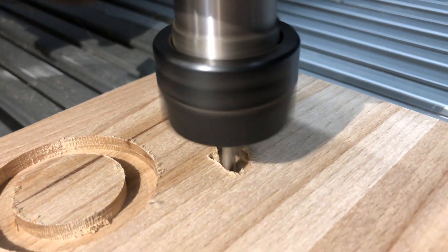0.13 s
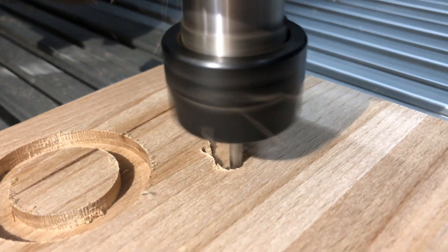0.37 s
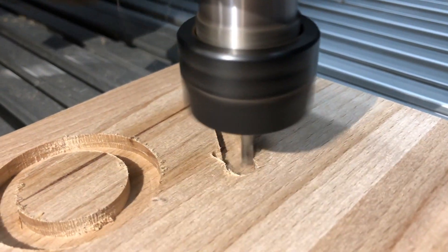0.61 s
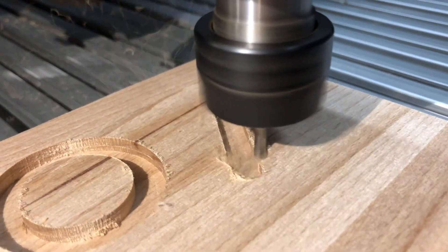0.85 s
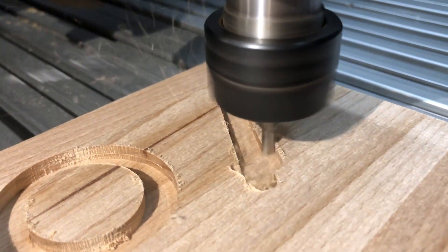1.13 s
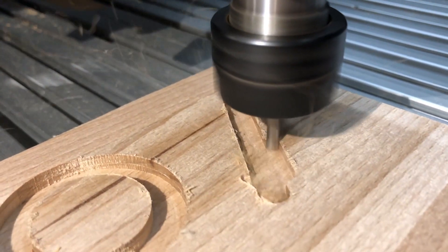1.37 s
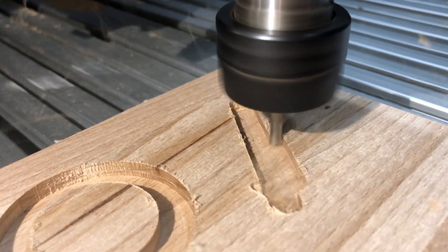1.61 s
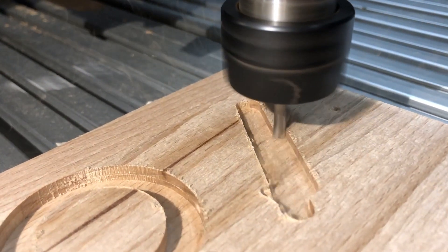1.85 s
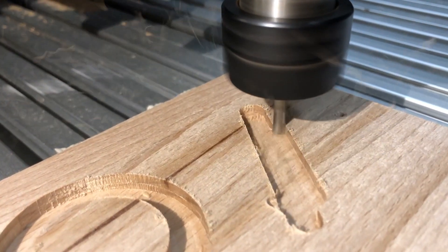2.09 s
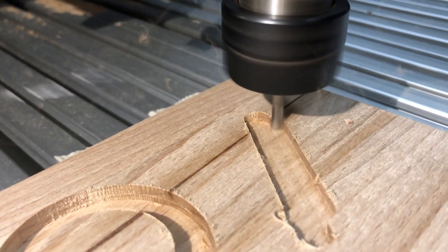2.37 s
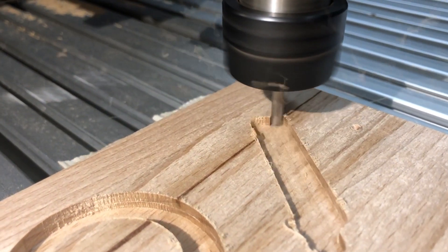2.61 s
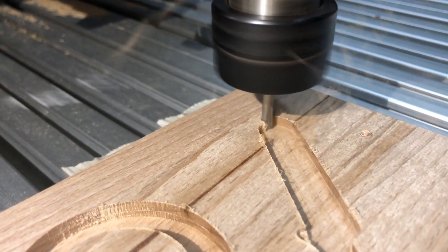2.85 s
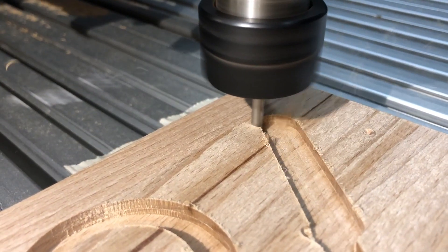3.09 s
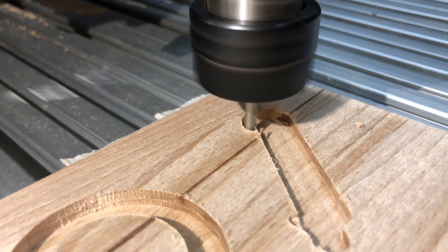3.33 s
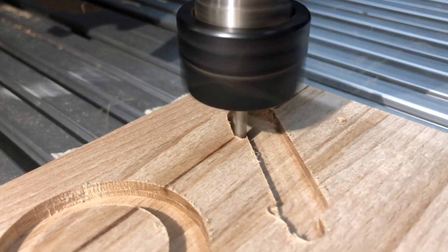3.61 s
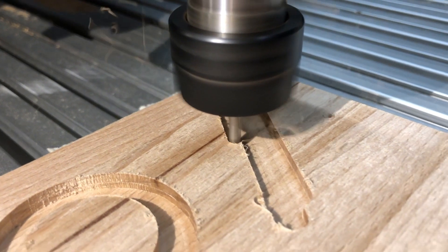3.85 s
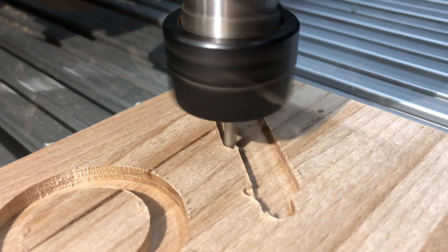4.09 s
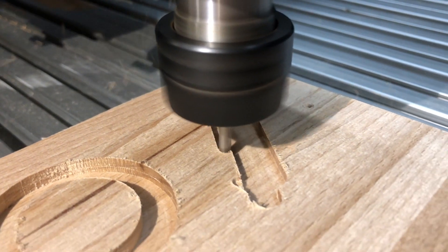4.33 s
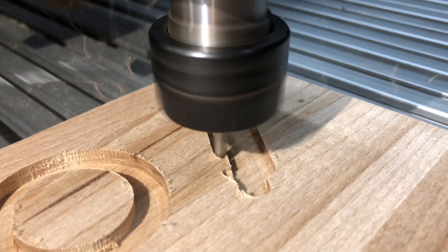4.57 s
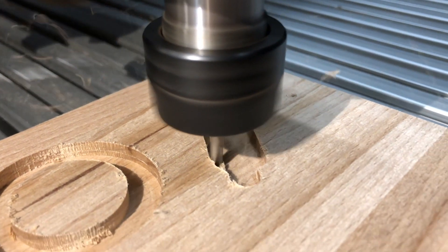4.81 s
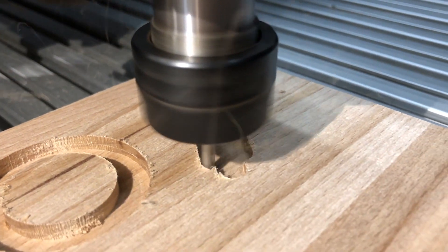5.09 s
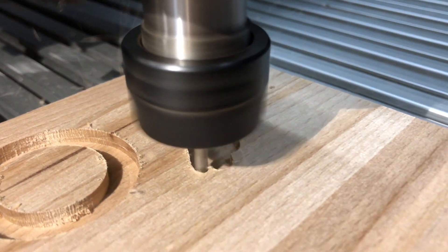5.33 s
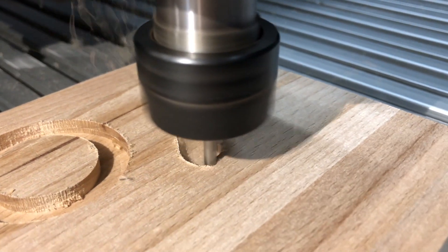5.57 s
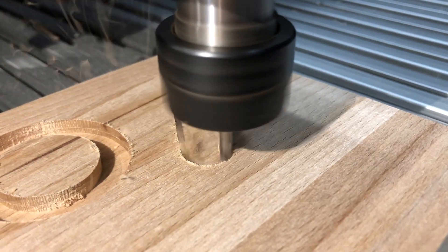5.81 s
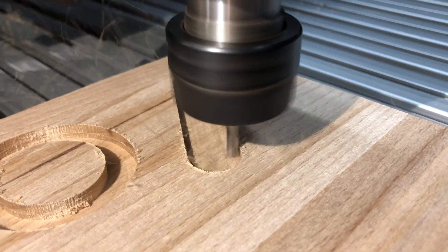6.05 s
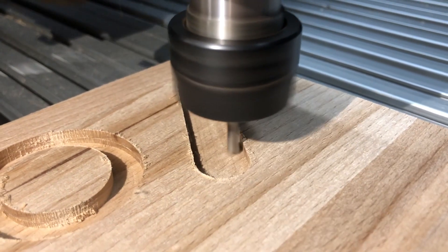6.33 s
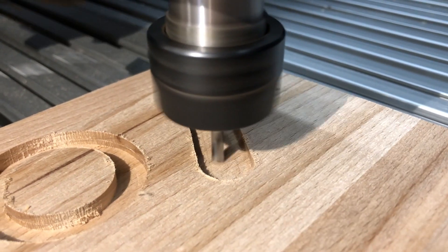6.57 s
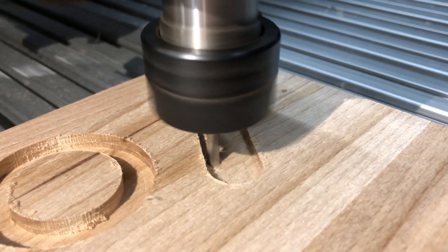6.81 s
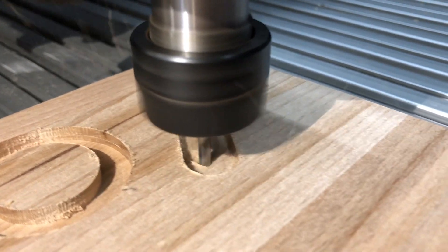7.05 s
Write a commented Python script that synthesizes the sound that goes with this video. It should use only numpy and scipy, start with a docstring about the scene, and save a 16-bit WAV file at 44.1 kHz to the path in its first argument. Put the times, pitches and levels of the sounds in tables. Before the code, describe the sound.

A steady, high-pitched spindle whine with airy roar fills a close mono microphone with automatic level control. A milling bit chatters shrilly in wood, stuttering on entry, easing, then screaming continuously along a slot and back, brighter and rougher at the far corner. Feed motors hum faintly below. After dull carriage knocks and one last strong cut, the screech fades to bare whine and a little hiss.

```python
"""At a router gantry, close to the work: a spindle whines at about 24000 turns a minute, heard by one
mono microphone with gain control, while a two-flute end mill cuts a wooden block.
Shaft multiples make the whine; noise rung by the housing is the roar; feed motors hum and knock below.
The tool chatters near 5 kHz as sidebands that form one burst per turn, with an octave and a twelfth.
Chips hiss as filtered noise that pulses with the turn."""
import sys
import numpy as np
from scipy import signal
from scipy.fft import rfft, irfft, next_fast_len
from scipy.io import wavfile
from scipy.ndimage import uniform_filter1d

SR = 44100
rng = np.random.default_rng(int(sys.argv[2]) if len(sys.argv) > 2 else 0)


def master_out(mix):
    """Clip the mix to full scale and print it as 16-bit PCM to the path in sys.argv[1]."""
    frames = np.transpose(np.atleast_2d(mix))
    ceiling = np.clip(frames, -1, 1)
    pcm = np.round(ceiling * 32767).astype(np.int16)
    wavfile.write(sys.argv[1], SR, pcm)


def rack_gain(trim_db):
    """Turn a fader trim in dB into the linear factor to multiply a signal by."""
    fader = np.asarray(trim_db, float)
    return 10 ** (fader / 20)


N = 316638
T = np.arange(N) / SR
SIZE = next_fast_len(N)
HZ = np.maximum(np.arange(SIZE // 2 + 1) * SR / SIZE, 1)

STEP = 64  # samples between points of the slowly changing sideband gains
MOVE_BLEND_S = .06
FULL_BITE_DB = -30.5  # chatter level of a full bite


def curves(table):
    """Columns of a table, drawn as straight lines between its times."""
    s, *columns = np.transpose(table)
    return [np.interp(T, s, c) for c in columns]


def steps(table, blend_s):
    """Columns held from one row's start to the next, with soft changes."""
    s, *columns = np.transpose(table)
    row = np.maximum(np.searchsorted(s, T) - 1, 0)
    return [uniform_filter1d(c[row], int(blend_s * SR) + 1) for c in columns]


def colour(points, hz):
    """Gain at hz of a spectrum given as (f/Hz, level/dB) points."""
    f, db = np.transpose(points)
    return rack_gain(np.interp(np.log(hz), np.log(f), db))


def unit(x):
    """Scale to rms 1."""
    return x / np.sqrt(np.mean(x ** 2))


def walk(rate):
    """Random levels held for 1 / rate s, slewed twice, rms 1."""
    hold = int(SR / rate)
    levels = np.repeat(rng.standard_normal(N // hold + 1), hold)
    return unit(uniform_filter1d(uniform_filter1d(levels, hold), hold)[:N])


def flickering_noise(gain, flicker_db, rate, count):
    """Noise whose half-octave bands, from 16 kHz down, waver separately; the last takes all below."""
    spectrum = rfft(rng.standard_normal(SIZE)) * gain
    place = np.minimum(2 * np.log2(16000 / np.minimum(HZ, 16000)), count - 1)
    out = 0
    for k in range(count):
        share = np.cos(np.pi / 2 * np.clip(place - k, -1, 1)) ** 2
        out = out + rack_gain(flicker_db * walk(rate)) * irfft(spectrum * share, SIZE)[:N]
    return unit(out)


# spindle rate, drooping under load: t/s, f/Hz
SHAFT = [(0, 397.9), (1, 397.6), (5.9, 397.5), (6.4, 398.2), (7.18, 397.8)]
SIDEBAND_HZ = SHAFT[0][1]  # spacing used to look up sideband gains


def shaft_turn():
    """Shaft angle in radians: the running sum of its rate."""
    return 2 * np.pi * np.cumsum(curves(SHAFT)[0]) / SR


# tool position along the slot: t/s, place (0 near end, 1 far end)
PATH = [(.8, 0), (2.6, 1), (3.2, 1), (5.3, 0)]


def slot_place():
    """The place of the tool sets how block and spindle sound."""
    return curves(PATH)[0]


def travel(place):
    """Share of the way back and of the sideways step at the far end, from the direction of motion."""
    way = uniform_filter1d(np.sign(np.gradient(place)), int(.1 * SR))
    returning = np.maximum(-way, 0) * np.minimum(place / .22, 1)
    crossing = place * (1 - np.abs(way))
    return returning, crossing


# how deep the edge bites: t/s, chatter level/dB
BITE = [(0, -56), (.1, -44), (.14, -31.5), (.33, -33), (.47, -31), (.51, -39.5), (.635, -46), (.655, -29.5),
        (.78, -26.5), (.95, -30), (1.6, -29), (2.05, -25.5), (2.66, -27), (2.85, -29), (3.05, -28.5),
        (3.08, -31.5), (3.14, -30.5), (3.21, -28), (3.25, -26), (4.4, -28), (4.8, -32), (5.25, -32),
        (5.5, -28), (5.9, -25), (6.09, -30.5), (6.105, -35), (6.15, -35.5), (6.45, -60), (7.18, -39)]


def bite_level():
    """Chatter level in dB follows the depth of the bite."""
    return curves(BITE)[0]


# shaft multiples: multiple, near-end level/dB, far-end level/dB, change on the way back/dB,
# change stepping sideways/dB, level out of the wood/dB
SHAFT_ORDERS = [(1, -50, -51.5, -4.5, -2, -52.5), (2, -40, -53.5, 6, 6.5, -49.5),
                (3, -54, -39.5, -3, -6, -66), (5, -77, -66, -9, 18, -74), (6, -39.5, -41.5, -1, 2.5, -37)]
# the third multiple drops out at the turn: from t/s, to t/s, level change/dB under full load
THIRD_DROPS = (3, 3.16, -11)


def loaded_orders(bite_db, place):
    """Shaft multiples change with the place on the block, the direction of travel and the load."""
    returning, crossing = travel(place)
    load = uniform_filter1d(1. * (bite_db > FULL_BITE_DB - 4), int(.3 * SR))
    start, end, drop_db = THIRD_DROPS
    turning = drop_db * uniform_filter1d(1. * (T > start) * (T < end), int(MOVE_BLEND_S * SR))
    lines = []
    for k, near, far, back, side, idle in SHAFT_ORDERS:
        cutting = near + (far - near) * place + back * returning + side * crossing
        cutting = cutting + (k == 3) * turning
        lines.append((round(k), idle + load * (cutting - idle)))
    return lines


# weak shaft multiples that hold their level: multiple, level/dB
WEAK_ORDERS = [(4, -52), (7, -57), (8, -56), (12, -56)]


def whine(turn, lines):
    """Clean shaft multiples, each wavering slightly in level and phase."""
    out = 0
    for k, db in [*lines, *WEAK_ORDERS]:
        level = np.sqrt(2) * rack_gain(db + 1.46 * walk(20) + 1.5 * walk(3.995))
        out = out + level * np.cos(k * turn + 0.15 * walk(15) + k)
    return out


# air and bearing roar before the housing: f/Hz, relative level/dB
ROAR = [(40, -41), (200, -26), (520, -20.5), (1200, -13), (2000, -15.5), (3300, -14.5), (5500, -18.5),
        (6400, -20), (9000, -18.5), (11800, -24), (15700, -24.5)]
# housing resonances: f/Hz, width between quarter-power points f/Hz, level over the roar/dB
HOUSING = [(865, 110, 11), (1703, 250, 6.5), (2300, 265, 8), (2564, 187, 8.5), (3850, 420, 7),
           (4770, 260, 9), (7320, 710, 6.5), (8280, 156, 8)]
# gantry shudder: f/Hz, relative level/dB
SHUDDER = [(25, -34), (42, -12), (70, -9.5), (160, 1.5), (320, -5.5), (600, -30.5)]
ROAR_DB = -30.5  # at the near end
FAR_ROAR_DB, SIDEWAYS_ROAR_DB = -3, 2.5  # weaker at the far end, less so while stepping sideways


def roar(place):
    """Air and bearing noise rung by the housing, over an unevenly shuddering gantry."""
    rings = sum((rack_gain(2 * db) - 1) / (1 + (2 * (HZ - hz) / width) ** 2) ** 2
                for hz, width, db in HOUSING)
    air = flickering_noise(colour(ROAR, HZ) * np.sqrt(1 + rings), 1.33, 7, count=13)
    shudder = flickering_noise(colour(SHUDDER, HZ), .1, 7, count=1) * rack_gain(3.3 * walk(25))
    level_db = ROAR_DB + FAR_ROAR_DB * place + SIDEWAYS_ROAR_DB * travel(place)[1]
    return rack_gain(level_db) * (air + rack_gain(-23.0) * shudder)


def spindle(turn, bite_db, place):
    """The turning shaft whines while its air and bearings roar."""
    return whine(turn, loaded_orders(bite_db, place)) + roar(place)


# feed motors: from t/s, to t/s, f/Hz, level/dB
FEED = [(0, .3, 145.5, -55.5), (.27, 0.42, 348, -50), (0.366, 0.685, 184.3, -56.5), (.95, 2.55, 144, -60),
        (.8, 2.6, 260, -61), (3.45, 5.301, 149.2, -60), (3.45, 5.306, 133.9, -58.5),
        (6.046, 6.43, 131.4, -57.5), (6.744, 7.2, 129.5, -59), (6.75, 7.206, 192.4, -58)]
# the carriage knocks as it reverses: t/s, f/Hz, peak level at onset/dB, 60 dB decay t/s
KNOCKS = [(5.34, 184, -34, 0.053), (5.39, 394, -34, 0.099), (5.39, 80, -41, 0.15), (5.47, 340, -36.5, 0.15),
          (5.921, 152, -37, 0.086)]


def feed():
    """Stepper hum for each move, and short knocks as decaying sines."""
    out = np.zeros(N)
    for start, end, hz, db in FEED:
        running = np.clip(np.minimum(T - start, end - T) / 0.032, 0, 1)
        hum = np.cos(2 * np.pi * hz * T + 0.25 * walk(9.6))
        out += running * np.sqrt(2) * rack_gain(db + 2.9 * walk(18)) * hum
    for s, hz, db, t60 in KNOCKS:
        age = np.maximum(T - s, 0)
        decay = rack_gain(db - 60 * age / t60) * np.minimum(age / 0.0019, 1)
        out += decay * np.sin(2 * np.pi * hz * age)
    return out


# overtones for each move: start t/s, octave loudest near f/Hz, octave level/dB,
# level/dB shared by twelfth and chips, all at full bite
OVERTONES = [(0, 10000, -39.5, -28.5), (.7, 11200, -34.5, -27.5), (.87, 9700, -42, -27.5),
             (1.75, 10200, -39.5, -31), (2.2, 10500, -36, -30), (2.62, 10600, -38.5, -32.5),
             (2.91, 10800, -31.5, -32), (3.07, 10300, -33, -29.5), (3.14, 11100, -30, -29),
             (3.25, 10600, -37.5, -31), (3.6, 10800, -34, -33), (4, 10560, -32.5, -32),
             (4.45, 10170, -31.5, -29), (4.87, 10150, -35.5, -27.5), (5.3, 9600, -40, -26),
             (5.61, 10200, -33.5, -25.5), (5.94, 10000, -37.5, -28)]


def overtone_levels(bite_db):
    """Octave region and overtone levels; below a full bite they fade with the chatter."""
    octave_hz, octave_db, top_db = steps(OVERTONES, MOVE_BLEND_S)
    lost_db = np.minimum(bite_db - FULL_BITE_DB, 0)
    return octave_hz, octave_db + lost_db, top_db + lost_db


# chip hiss: f/Hz, relative level/dB
CHIP_COLOUR = [(3000, -51), (4700, -11), (6500, -15), (8500, -25), (10200, -14), (12000, -18), (13300, -14),
               (14100, -5), (14900, 0), (15800, -6)]


def chips(turn, top_db, tonal):
    """Chip hiss pulses with the turn and takes the share of the top band that is not tonal."""
    hiss = flickering_noise(colour(CHIP_COLOUR, HZ), 1.7, 17, count=5)
    hiss = unit(hiss * (1 + .6 * np.cos(turn + 1.6)))
    return rack_gain(top_db + 3.5 + 1.2 * walk(40)) * np.sqrt(1 - tonal) * hiss


STUTTER_DB, STUTTER_ABOVE_HZ = -11, 5250


def bursts(phase, hz, turn, weight, sweep, waver_db, count, gaps=0 * T, gaps_above_hz=0):
    """One burst per turn from sidebands a shaft rate apart, rms 1 before the gaps.

    sweep smears the burst into a glide; gaps lower the upper sidebands."""
    orders = range(-count, count + 1)
    places = [hz[::STEP] + k * SIDEBAND_HZ for k in orders]
    gains = np.array([weight(f, k) * rack_gain(waver_db * walk(3.81)[::STEP])
                      for f, k in zip(places, orders)])
    gains /= np.sqrt(np.sum(gains ** 2, axis=0) / 2)
    gains *= [rack_gain(STUTTER_DB * gaps[::STEP] * (f > gaps_above_hz)) for f in places]
    return sum(np.interp(T, T[::STEP], g) * np.cos(phase + k * turn + sweep * k ** 2)
               for k, g in zip(orders, gains))


# the upper chatter stutters at corners, entry and exit: from t/s, to t/s, mean stutter f/Hz,
# depth (0-1), added phase jitter/rad rms
ROUGH = [(.13, .5, 62, .7, .4), (.66, .718, 72, .8, .08), (.762, .83, 78, .8, .08),
         (1.3, 1.45, 22, .6, .15), (2.66, 2.92, 70, .3, .15), (2.92, 3.06, 72, .55, .15),
         (3.06, 3.145, 55, .3, 1.15), (3.145, 3.235, 62, .7, .3), (6.02, 6.095, 60, .2, .35),
         (6.095, 6.2, 60, .7, 1.5)]


def stutter():
    """Added phase jitter where the cut is unsteady, and how far the upper chatter drops out (0-1)."""
    rate, depth, jitter = sum(np.outer(row, (T > start) & (T < end)) for start, end, *row in ROUGH)
    beat = np.cos(2 * np.pi * np.cumsum(rate * (1 + .3 * walk(50))) / SR)
    dropped = depth * np.clip(.5 - 2 * beat, 0, 1)
    return uniform_filter1d(jitter, 400), uniform_filter1d(dropped, 64)


# the edge skips over torn fibres: t/s, level lost/dB
SKIPS = [(1.41, 7), (2.068, 8), (2.303, 7), (2.359, 8), (2.447, 8), (2.481, 7), (2.568, 7), (2.771, 7),
         (3.488, 8), (3.622, 6), (3.949, 7), (4.115, 7), (4.148, 10), (4.189, 7), (4.278, 9), (4.719, 6)]
SKIP_S = .003  # time scale of each dip and slip


def skip_ages():
    """Time from each skip, in units of its time scale."""
    return [(T - s) / SKIP_S for s, _ in SKIPS]


def grain(skips):
    """Cutting gain: fibres differ from turn to turn, the edge loses its bite or skips."""
    gain = rack_gain(1.3 * walk(200) + 0.3 * walk(16))
    gain *= rack_gain(-np.minimum(1.4 * np.maximum(walk(75) - .8, 0) ** 2, 5))
    return gain * rack_gain(-sum(lost * np.exp(-u ** 2 / 2) for u, (_, lost) in zip(skips, SKIPS)))


# chatter pitch: t/s, mean f/Hz
PITCH = [(.08, 4970), (.16, 5015), (.24, 5048), (.3, 5020), (.4, 4992), (.44, 5010), (.49, 4965),
         (.64, 4960), (.68, 5050), (.75, 5120), (.84, 5100), (.88, 5067), (1.2, 5066), (1.28, 5097),
         (1.5, 5088), (1.6, 5063), (2.05, 5085), (2.6, 5088), (2.89, 5062), (2.92, 5098), (3.055, 5108),
         (3.07, 4960), (3.125, 4965), (3.15, 5108), (3.32, 5080), (3.8, 5092), (4.1, 5071), (4.5, 5079),
         (4.77, 5074), (4.81, 5092), (4.87, 5034), (5.3, 5075), (5.45, 5056), (5.61, 5064), (5.63, 5107),
         (5.86, 5109), (6, 5084), (6.1, 5015), (6.17, 4930)]
STEADY_JITTER = .36  # rad rms of chatter phase
SKIP_SLIP_RAD = 1.5  # largest slip to either side of a skip


def chatter_phase(unsteady, skips):
    """Chatter frequency and phase; after each skip the chatter restarts out of step."""
    hz = curves(PITCH)[0]
    phase = 2 * np.pi * np.cumsum(hz + 4 * walk(60)) / SR
    phase += (STEADY_JITTER + unsteady) * walk(170)
    slips = rng.uniform(-0.983, 1, len(SKIPS))
    phase += sum(SKIP_SLIP_RAD * slip * np.tanh(u) for u, slip in zip(skips, slips))
    return hz, phase


# tool moves: start t/s, chatter loudest near f/Hz, spread f/Hz, second flute share (-1 to 1)
MOVES = [(0, 4700, 135, -0.094), (.64, 4770, 400, 0.1), (.87, 4780, 500, 0), (1.3, 5050, 400, -0),
         (1.7, 5080, 400, -0.05), (2.2, 5080, 540, 0.2), (2.64, 4850, 300, 0.65), (2.9, 4750, 300, 0.56),
         (3.07, 4700, 550, .17), (3.23, 4970, 110, 0.16), (3.65, 4980, 110, 0.28), (4.05, 4890, 125, 0.2),
         (4.45, 4730, 171, 0.1), (4.87, 4640, 110, 0.05), (5.3, 4730, 110, 0.4), (5.61, 4750, 297, 0.16),
         (5.94, 4960, 430, -0.2)]
# how well block and table radiate the chatter: f/Hz, relative level/dB
RADIATION = [(3890, -4.5), (4280, -1.5), (4680, -4), (5080, 3), (5480, 5), (5880, 10), (6270, 3.5),
             (6670, 2)]
FAR_ABOVE_HZ, FAR_DB = 6100, 6.5  # the far end of the block rings higher
NEAR_DULL_HZ, NEAR_DULL_DB = 5080, -7  # the near end radiates this region poorly


def chatter(phase, hz, turn, place, dropped):
    """Tool resonance picks the sidebands of the chatter, and the block radiates them."""
    centre_hz, spread_hz, share = [c[::STEP] for c in steps(MOVES, MOVE_BLEND_S)]
    spot = place[::STEP]

    def tool(f, k):
        """A second flute half a turn later favours every other sideband."""
        flutes = 1 - np.clip(share, -.9, .9) * (-1) ** k
        dull = np.abs(f - NEAR_DULL_HZ) < SIDEBAND_HZ / 2
        near = rack_gain(NEAR_DULL_DB * (1 - spot) ** 2 * dull)
        far = rack_gain(FAR_DB * spot * (1.0 - np.abs(share)) * (f > FAR_ABOVE_HZ))
        resonance = 1 / np.sqrt(1 + ((f - centre_hz) / np.maximum(spread_hz, 60)) ** 2)
        return near * flutes * far * colour(RADIATION, f) * resonance

    return bursts(phase, hz, turn, tool, -0.25, 0.78, count=4,
                  gaps=dropped, gaps_above_hz=STUTTER_ABOVE_HZ)


# octave of the chatter: f/Hz, relative level/dB
OCTAVE = [(9000, -8.5), (9370, -8), (9770, -2), (10170, -4), (10570, -9), (11160, -5), (11960, -5.5),
          (13000, -3)]


def octave(phase, hz, turn, octave_hz, dropped):
    """Twice the chatter frequency, leaning to a moving region."""
    def lean(f, k):
        """Fixed colour times a broad moving peak."""
        return colour(OCTAVE, f) / (1 + ((f - octave_hz[::STEP]) / 1250) ** 2)

    return bursts(2 * phase, 2 * hz, turn + 1.3, lean, -.2, 2.5, count=7,
                  gaps=dropped, gaps_above_hz=2 * STUTTER_ABOVE_HZ)


# twelfth of the chatter: f/Hz, relative level/dB
TWELFTH = [(13250, -14), (13650, -10), (14050, -2), (14450, -3), (14850, 0), (15250, 0), (15650, -6)]


def twelfth(phase, hz, turn):
    """Three times the chatter frequency, with sidebands kept below 15.8 kHz."""
    return bursts(3 * phase, 3 * hz, turn + 3.0, lambda f, k: colour(TWELFTH, f) * (f < 15800),
                  -0.53, 2.6, count=5)


CHATTER_FROM_S, CHATTER_TO_S = 0.13, 6.17
TONAL_FROM_DB, TONAL_PER_DB = -56, .03  # the harder the octave rings, the more tonal the top band


def cutter(turn, bite_db, place):
    """Chatter with its octave and twelfth, and the hiss of chips, all pulsing with the turn."""
    octave_hz, octave_db, top_db = overtone_levels(bite_db)
    unsteady, dropped = stutter()
    skips = skip_ages()
    hz, phase = chatter_phase(unsteady, skips)
    cutting = (T > CHATTER_FROM_S) & (T < CHATTER_TO_S)
    tonal = np.clip(TONAL_PER_DB * (octave_db - TONAL_FROM_DB), 0, .9) * cutting
    ring = rack_gain(bite_db) * cutting * chatter(phase, hz, turn, place, dropped)
    ring += rack_gain(octave_db + walk(70)) * cutting * octave(phase, hz, turn, octave_hz, dropped)
    ring += rack_gain(top_db + 1.2 * walk(11)) * np.sqrt(tonal) * twelfth(phase, hz, turn)
    return grain(skips) * ring + chips(turn, top_db, tonal)


def scene():
    """All sources reach one close microphone, heard alike left and right."""
    bite_db, place = bite_level(), slot_place()
    turn = shaft_turn()
    sound = spindle(turn, bite_db, place) + feed() + cutter(turn, bite_db, place)
    return np.array([sound, sound])


def top_cut(x):
    """Nothing passes above the cut-off."""
    return signal.sosfilt(signal.butter(12, 15880, fs=SR, output="sos"), x)


GAIN_TIME_S, GAIN_RATIO = 0.43, 2.42
GAIN_KNEE_DB = -26  # level left unchanged: louder is lowered, softer is raised


def record(dry):
    """A slow gain control at the microphone rides the smoothed power, alike left and right."""
    keep = np.exp(-1 / (GAIN_TIME_S * SR))
    knee = rack_gain(2 * GAIN_KNEE_DB)
    power = signal.lfilter([1 - keep], [1, -keep], dry[0] ** 2, zi=[knee])[0]
    gain = (knee / power) ** ((1 - 1 / GAIN_RATIO) / 2)
    return top_cut(dry * gain)


dry = scene()
out = record(dry)
master_out(out)
```